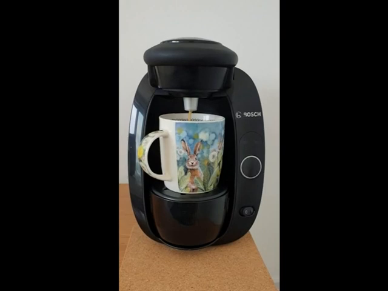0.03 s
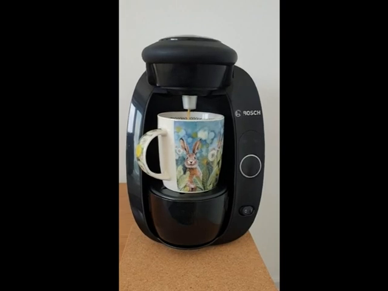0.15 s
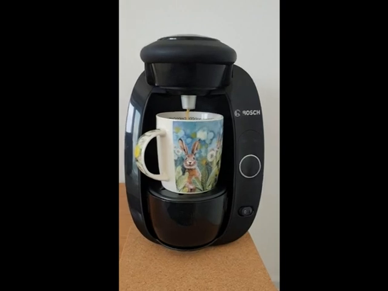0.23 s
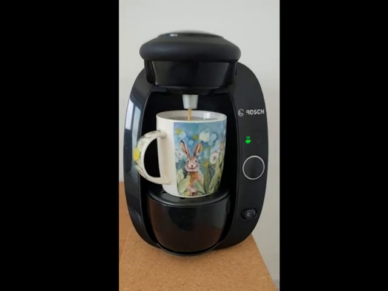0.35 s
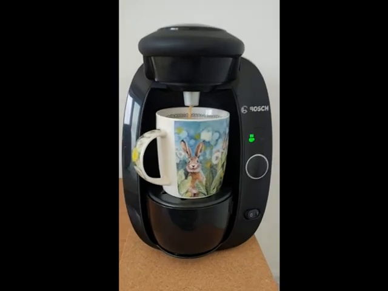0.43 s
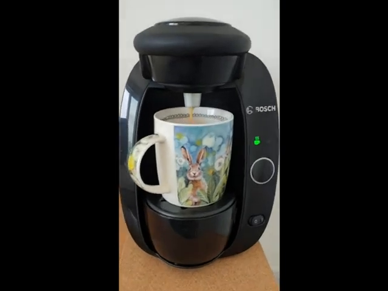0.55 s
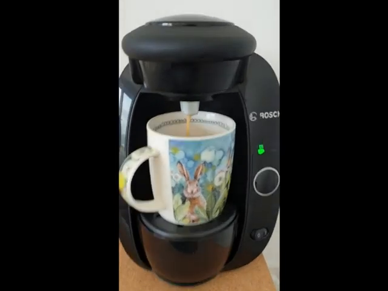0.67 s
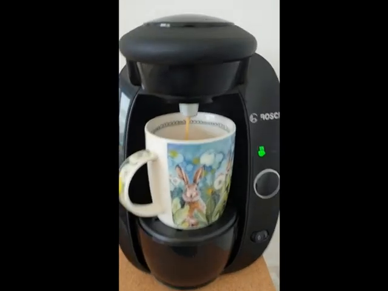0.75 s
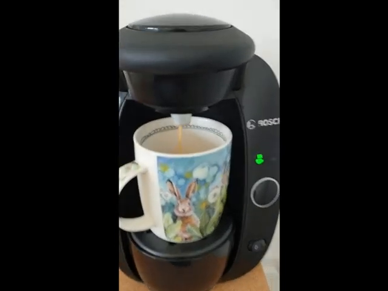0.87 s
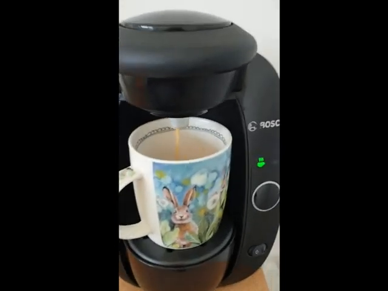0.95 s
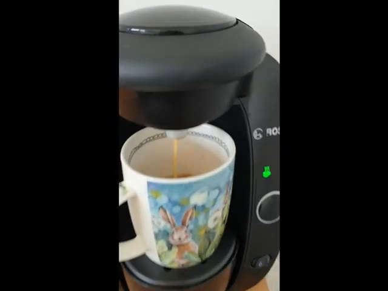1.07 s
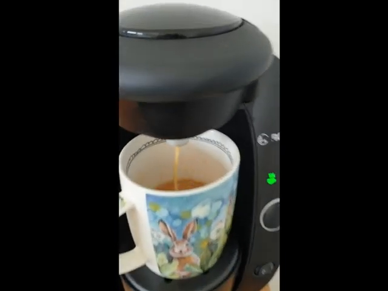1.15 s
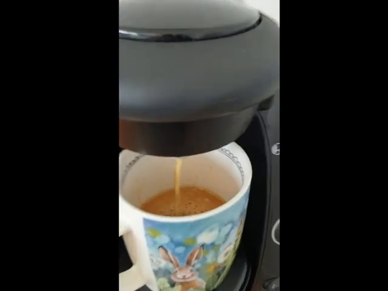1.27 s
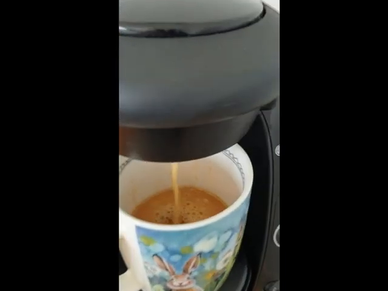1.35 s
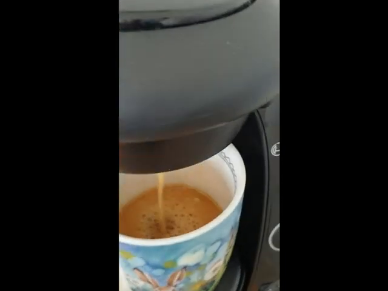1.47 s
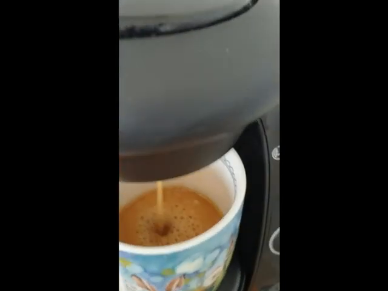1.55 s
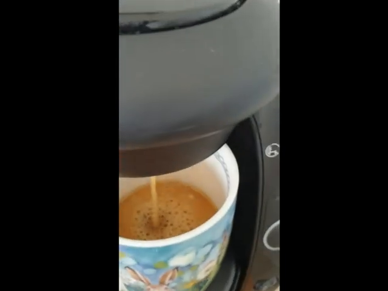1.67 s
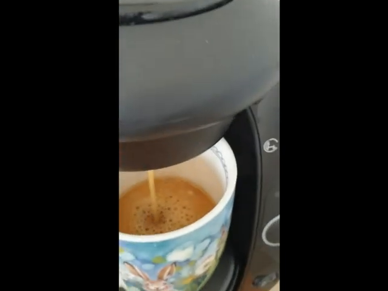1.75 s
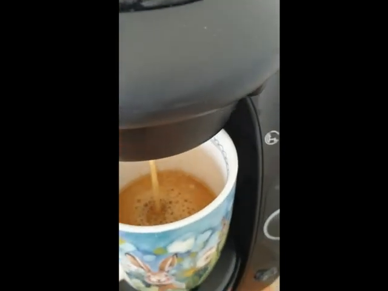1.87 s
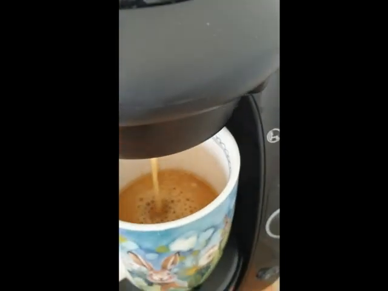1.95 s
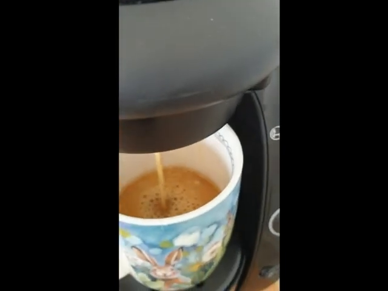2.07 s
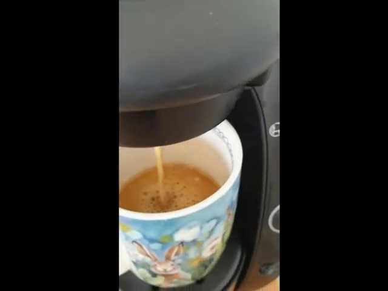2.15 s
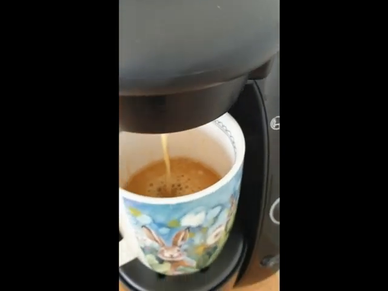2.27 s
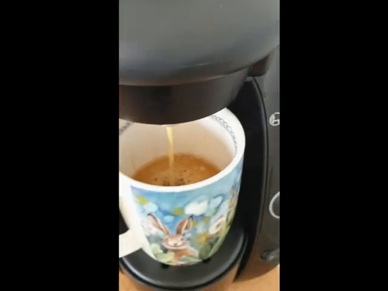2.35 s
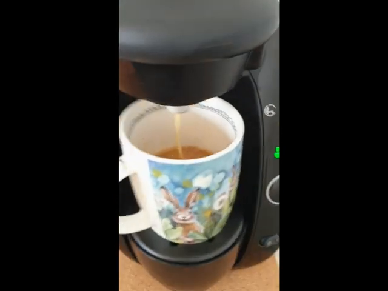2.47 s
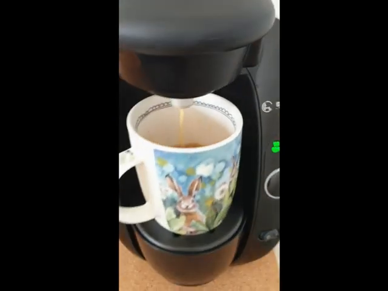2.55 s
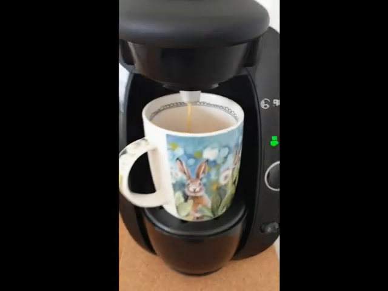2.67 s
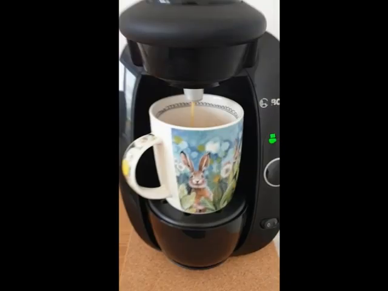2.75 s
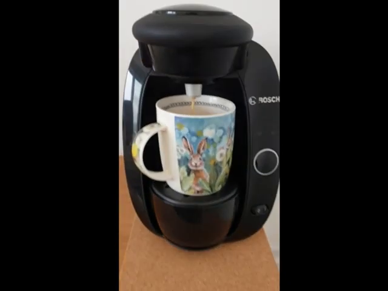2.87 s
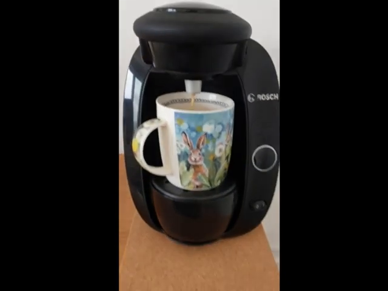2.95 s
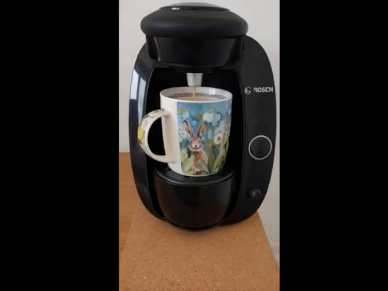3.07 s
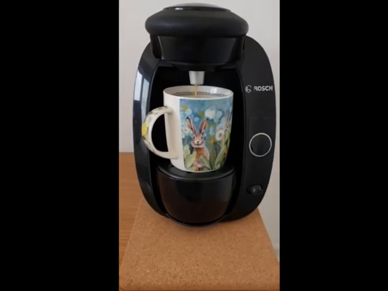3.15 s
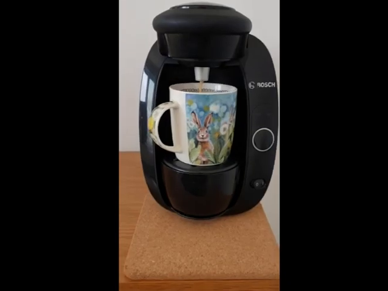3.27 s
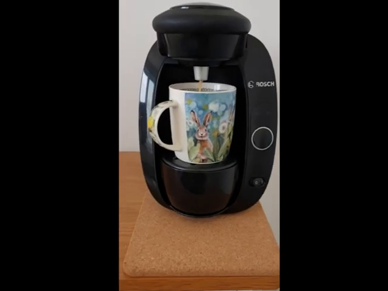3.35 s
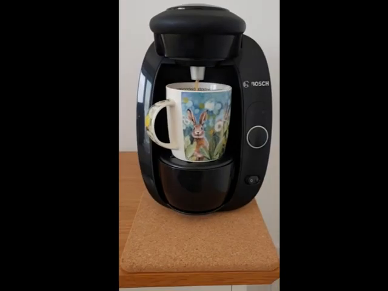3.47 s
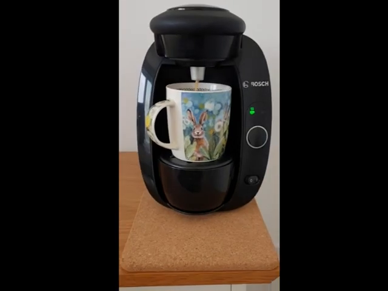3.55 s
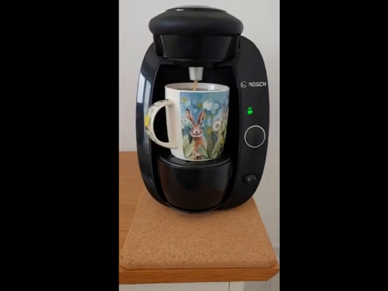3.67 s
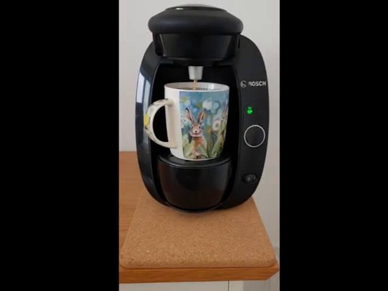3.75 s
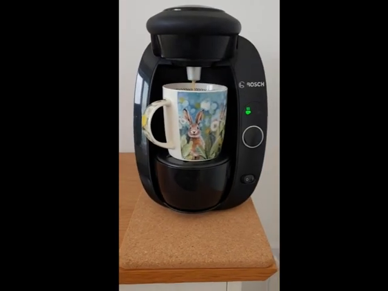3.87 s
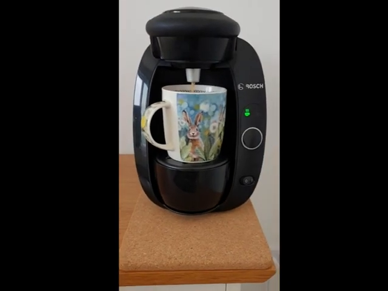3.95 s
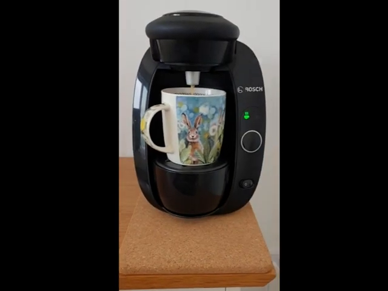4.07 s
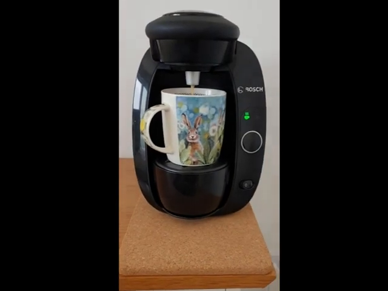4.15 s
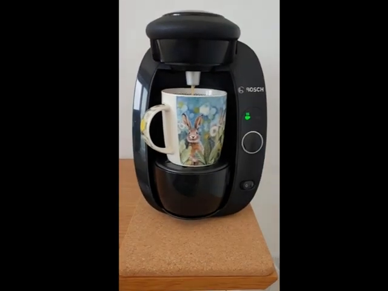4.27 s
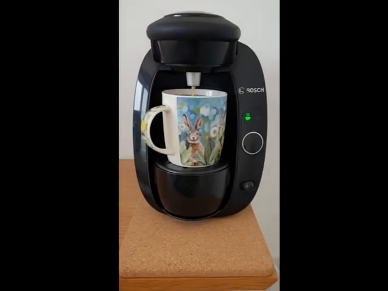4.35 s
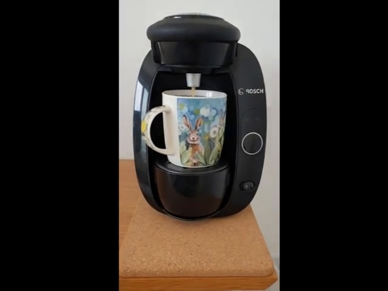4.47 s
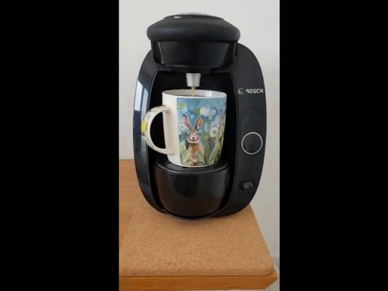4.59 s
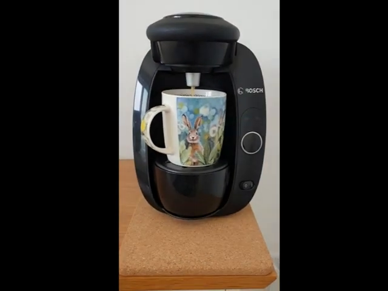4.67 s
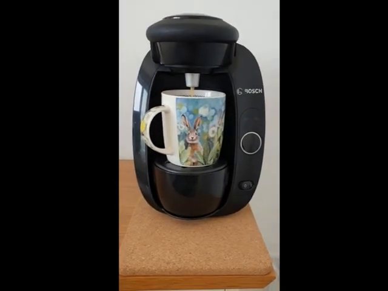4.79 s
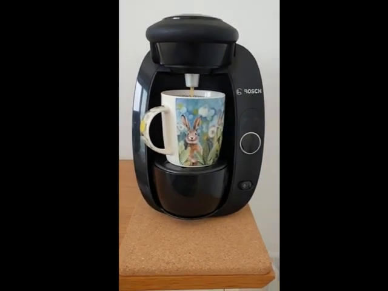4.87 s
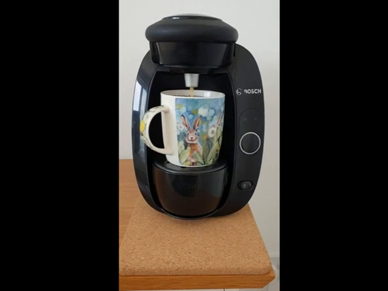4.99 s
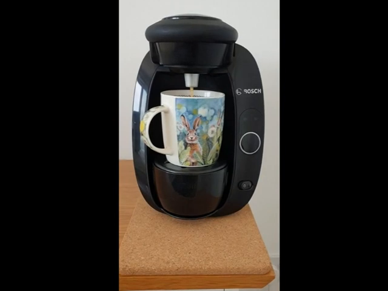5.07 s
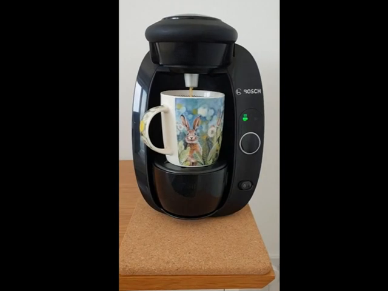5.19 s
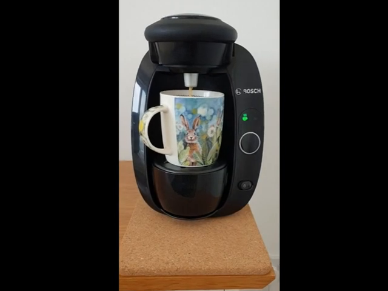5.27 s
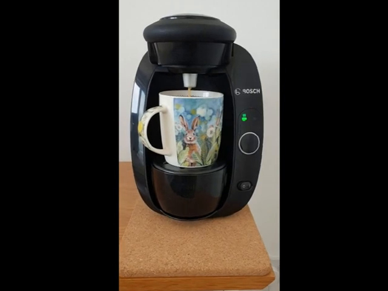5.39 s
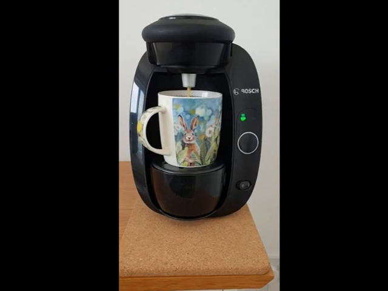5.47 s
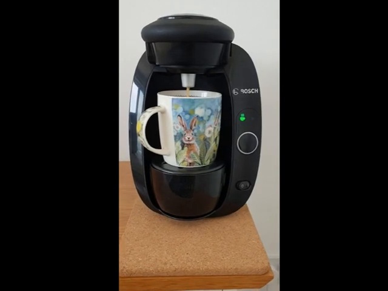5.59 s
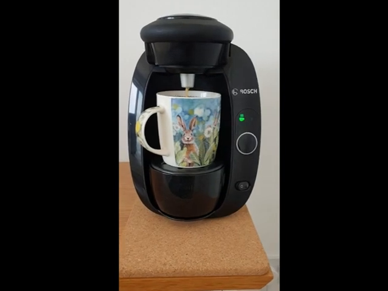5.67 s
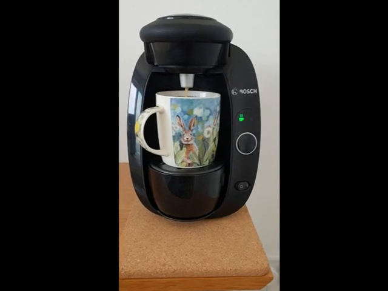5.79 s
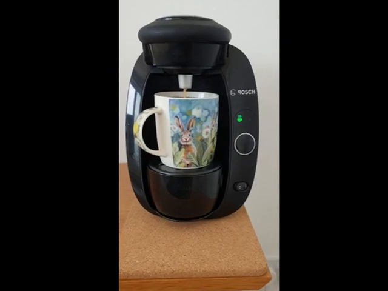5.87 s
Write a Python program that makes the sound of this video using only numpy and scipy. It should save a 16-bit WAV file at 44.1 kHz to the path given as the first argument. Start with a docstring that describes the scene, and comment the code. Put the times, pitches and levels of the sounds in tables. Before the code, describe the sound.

The steady buzzing hum of a coffee machine's pump, with coffee trickling and softly plopping into a mug.

```python
"""A steady hum and buzz fills a kitchen: a pod coffee machine's pump, shaking at the mains rate.
The pump pushes churning water to a nozzle, which hisses and whistles. Coffee streams into a mug,
where trapped bubbles plop and the foam fizzes and ticks. The microphone leans in to the mug
and back, and fingers softly scuff its case."""
import sys
import numpy as np
from scipy import signal
from scipy.fft import rfft, irfft, next_fast_len
from scipy.io import wavfile
from scipy.ndimage import map_coordinates

SR = 44100
rng = np.random.default_rng(int(sys.argv[2]) if len(sys.argv) > 2 else 0)


def inscribe(sig):
    """Save sig as 16-bit PCM at rate SR to the path in sys.argv[1].

    A 1-D sig is mono; a 2-D sig holds one channel per row.
    Samples are clipped to [-1, 1] before scaling.
    """
    pcm = np.round(np.clip(np.atleast_2d(sig).T, -1, 1) * 32767)
    wavfile.write(sys.argv[1], SR, pcm.astype(np.int16))


N = 261513
TIME = np.arange(N) / SR

# The tone colours of the kitchen, a finger's brush, the foam, the jet's spray and the piston's rattle.
# Each row: frequency in Hz, relative level in dB.
ROOM_COLOUR = [(15, -13.5), (35, -12.5), (62, 1), (90, -5.5), (160, -4), (240, -16.5), (500, -14.5),
               (2000, -32), (5000, -28), (7500, -36.5), (8500, -54), (16000, -42)]
BRUSH_COLOUR = [(150, -13), (300, 3.5), (600, 3.5), (1500, 5.5), (4000, -2.5), (6500, -4), (9000, -15),
                (12000, -20), (14000, -8), (15700, -17)]
FOAM_COLOUR = [(300, -35), (700, -0.5), (1200, 9), (1500, -6), (2800, 8.5), (3150, 2), (3700, 4),
               (4600, -0.5), (5400, 4), (6800, -5), (8000, -9.5), (8800, -23.5), (10000, -17.5),
               (15000, -31)]
SPRAY_COLOUR = [(7000, -39), (9000, -25), (11300, -17), (11800, -8), (12800, -4), (13300, 1.5), (14300, 3),
                (14900, -17.5), (15700, -26)]
RATTLE_COLOUR = [(1700, -40), (1900, -2), (2250, -3.5), (2500, -11), (2800, -7), (3150, -16), (3700, -12.5),
                 (4500, -14.5), (5300, -12.5), (7000, -35), (9000, -57)]
# Finger touches. Each row: start in seconds, brush level in dB, rise in seconds,
# seconds to fade by 60 dB, knock level in dB.
TOUCHES = [(0.349, -63.5, 0.0066, 0.11, -51), (3.243, -47, 0.015, 0.31, -50),
           (3.359, -51.5, 0.0023, 0.16, -47)]
# Bubbles bursting in the foam. Each row: start in seconds, level in dB, pitch in Hz.
FOAM_TICKS = [(1.574, -38, 3850), (1.727, -40, 2920), (1.728, -40, 4300)]
# The loudest plops in the mug. Each row: start in seconds, relative level in dB.
LOUD_PLOPS = [(0.095, -32.5), (.346, -35.5), (.529, -32.5), (1.038, -34), (1.182, -31), (1.508, -28.5),
              (1.879, -32.5), (2.935, -36.5), (3.179, -31.5), (3.387, -38), (3.75, -37), (4.638, -37.5),
              (5.175, -36.5)]
# Where the nozzle, the jet's whistle and the water in the housing ring.
# Each row: pitch in Hz, width in Hz, relative level in dB.
NOZZLE_RINGS = [(2250, 430, -8), (2690, 590, 2), (3530, 140, 3), (4075, 130, 4), (5400, 360, 0.5),
                (6770, 200, -2.5), (7750, 140, -7.5)]
WHISTLE_RINGS = [(6163, 290, 0)]
CHURN_RINGS = [(369.5, 36, 0), (572, 120, -2), (700, 130, -3), (930, 320, -8.5), (1298, 61, -8),
               (1618, 200, -12.5), (1850, 270, -14)]
# Brief swells in level; the last is a short treble flick over a burble. Each row: middle in seconds,
# half length in seconds, then the boosts in dB for the whistle, the spray's high hiss and the churn.
SWELLS = [(0.707, 0.2, 5, -0.5, 1.5), (3.446, 0.45, 0.5, 3, 0), (5.115, 0.068, 4.5, 4.5, 1.5)]
# The housing's tone from the front, from one side and at the mug.
# Each row: multiple of the pump's stroke rate, relative level in dB.
TONE_FRONT = [(1, -3.5), (2, 5.5), (3, 0.5), (4, -14), (5, -21), (6, -33.5), (7, -34.5), (8, -19.5),
              (9, -30.5), (10, -23), (11, -23), (12, -37), (13, -27), (14, -22), (15, -30.5), (16, -14.5),
              (17, -22.5), (18, -33), (19, -33.5), (20, -53.5), (21, -27), (22, -25.5), (23, -31.5),
              (24, -50), (25, -28.5), (26, -40.5), (27, -42), (28, -28), (29, -56), (30, -33.5),
              (31, -37.5), (32, -40.5), (33, -41.5), (34, -36.5), (35, -38), (36, -31.5)]
TONE_SIDE = [(1, -7.5), (2, 2.5), (3, -3.5), (4, -15), (5, -19.5), (6, -42.5), (7, -54), (8, -24.5),
             (9, -45), (10, -27.5), (11, -23.5), (12, -33.5), (13, -18), (14, -25), (15, -26.5), (16, -22),
             (17, -35), (18, -32.5), (19, -27), (20, -27.5), (21, -29.5), (22, -27.5), (23, -27.5),
             (24, -44), (25, -25), (26, -27.5), (27, -35.5), (28, -34.5), (29, -48), (30, -40), (31, -38),
             (32, -43.5), (33, -33), (34, -40.5), (35, -43.5), (36, -38)]
TONE_AT_MUG = [(1, -13), (2, 0), (3, -5.5), (4, -16.5), (5, -24.5), (6, -29), (7, -21), (8, -17.5),
               (9, -26), (10, -20), (11, -24.5), (12, -37), (13, -25), (14, -28), (15, -31), (16, -20.5),
               (17, -33), (18, -34.5), (19, -25), (20, -42.5), (21, -41.5), (22, -40), (23, -37), (24, -41),
               (25, -28), (26, -27), (27, -36), (28, -35.5), (29, -44), (30, -46.5), (31, -48), (32, -40),
               (33, -43.5), (34, -40.5), (35, -48), (36, -41)]
# Stereo balance far from the mug and over it. Each row: frequency in Hz, left minus right in dB.
BALANCE_FAR = [(50, -1), (100, -0.5), (150, 3), (210, -3), (340, 11.5), (500, 1.5), (780, -5.5), (1170, 0),
               (1790, -1), (2740, -3), (4190, -8), (6300, -4), (9800, -3), (14000, -12.5)]
BALANCE_AT_MUG = [(60, 1.5), (110, 1.5), (200, 2), (380, -1), (700, -4.5), (1290, -2), (2380, 1.5),
                  (4400, -1.0), (8120, -3.5), (15000, -11.5)]
# How alike left and right are. Each row: frequency in Hz, likeness (1 the same, 0 unrelated).
LIKENESS = [(100, 1), (300, 0.92), (700, 0.66), (1300, 0.51), (2500, -0.074), (4200, 0.039), (6200, -0.28),
            (9000, 0.059)]

PUMP_HZ, HUM_TOP_HZ = 50.06, 280  # the stroke rate, and where hum gives way to buzz


def amp(db):
    """Turn decibels into a gain."""
    return 10 ** (np.asarray(db) / 20)


def unit(x):
    """Scale a sound to an average (rms) level of 1."""
    return x / np.sqrt(np.mean(x ** 2) + 1e-20)


def along(points, hz):
    """Read between a table's rows on a log frequency scale."""
    freqs, values = np.transpose(points)
    return np.interp(np.log(hz + 1), np.log(freqs + 1), values)


def wobble(rate):
    """A smooth random curve through `rate` new values a second."""
    return map_coordinates(rng.standard_normal(int(N * rate / SR) + 4), [TIME * rate])


def filtered(x, response):
    """Turn each frequency up or down by response(hz)."""
    size = next_fast_len(N + SR // 4)
    return irfft(rfft(x, size) * response(np.fft.rfftfreq(size, 1 / SR)), size)[..., :N]


def colour(points):
    """Make a filter response from a tone colour table."""
    return lambda hz: amp(along(points, hz))


def resonances(rings):
    """Make a filter response with one steep peak for each row."""
    return lambda f: np.sqrt(sum((amp(db) / (1 + 2 * ((f - hz) / width) ** 2)) ** 2
                                 for hz, width, db in rings))


def stereo_angle(hz):
    """An angle that grows as left and right become less alike."""
    return np.arccos(np.clip(along(LIKENESS, hz), -1, 1)) / 2


def stereo(pair, response):
    """Filter two unrelated sounds and blend them into left and right at level 1."""
    blend = lambda hz: np.array([np.cos(stereo_angle(hz)), np.sin(stereo_angle(hz))])
    mid, side = filtered(pair, lambda hz: response(hz) * blend(hz))
    return unit(np.array([mid + side, mid - side]))


def noise(response, flicker_db=0):
    """Filtered stereo noise at level 1, made uneven by a flicker curve if given."""
    return stereo(rng.standard_normal((2, N)) * amp(flicker_db), response)


def bubble(t, hz, cycles, glide):
    """A bubble swells within one cycle, rises in pitch and fades by 60 dB over `cycles`."""
    age = t * hz / cycles
    swell = 1 - np.exp(-(t * hz) ** 2)
    return swell * amp(-60 * age) * np.sin(2 * np.pi * hz * t * (1 + glide * age))


def balanced(sound, balance):
    """Share each frequency between left and right, keeping the total power."""
    def response(hz):
        left_db = along(balance, hz) / 2
        sides = amp([left_db, -left_db])
        return sides / np.sqrt(np.mean(sides ** 2, axis=0))
    return filtered(sound, response)


def microphone(start_s, lean_s, hold_s, back_s, rest_nearness, swing_s):
    """The microphone leans in to the mug and back while swinging from one side to the front."""
    lean_in = np.clip((TIME - start_s) / lean_s, 0, 1)
    draw_back = np.clip((TIME - start_s - lean_s - hold_s) / back_s, 0, 1)
    near = np.clip(lean_in - (1 - rest_nearness) * draw_back, 0, 1)  # 0 far, 1 over the rim
    aside = np.clip(1 - TIME / swing_s, 0, 1)  # 1 at the side, 0 in front
    return near, aside


def swells():
    """The whistle, the high hiss and the churn swell briefly: one curve in dB for each."""
    return sum(np.outer(boosts, np.exp(-((TIME - middle) / half_length) ** 2))
               for middle, half_length, *boosts in SWELLS)


def kitchen(level_db):
    """The room's low, steady noise."""
    return amp(level_db) * noise(colour(ROOM_COLOUR))


def scuffs(knock_hz, knock_fade_s):
    """Fingers brush the case beside the microphone and knock it dully."""
    brush = knock = 0
    for start, brush_db, rise_s, fade_s, knock_db in TOUCHES:
        t = np.maximum(TIME - start, 0)
        onset = 1 - np.exp(-t / rise_s)
        brush += amp(brush_db - 60 * t / fade_s) * onset
        knock += amp(knock_db - 60 * t / knock_fade_s) * onset * np.sin(2 * np.pi * knock_hz * t)
    return brush * noise(colour(BRUSH_COLOUR)) + knock


def foam_fizz(near, level_db, far_share, crackle_db):
    """The stream fizzes in the foam, heard best over the rim."""
    return amp(level_db) * (far_share + near) * noise(colour(FOAM_COLOUR), crackle_db * wobble(300))


def foam_ticks(cycles):
    """Each bursting bubble rings high for an instant."""
    return sum(amp(db) * bubble(np.maximum(TIME - start, 0), hz, cycles, glide=0.05)
               for start, db, hz in FOAM_TICKS)


def nozzle(near, whistle_swell_db, spray_swell_db, hiss_db, sputter_db):
    """The jet sputters through the ringing nozzle, whistles hoarsely and throws a fine, high spray."""
    whistle_db = -63.5 + 2 * near + whistle_swell_db + 0.5 * wobble(7)
    spray_db = -73 + 3 * near + spray_swell_db - 0.65 * TIME  # fades as the brew goes on
    sputter = lambda: sputter_db * wobble(110) + 0.65 * np.cos(2 * np.pi * PUMP_HZ * TIME)
    follow_db = 0.61 * (spray_db - spray_db.mean())  # the hiss partly follows the spray
    hiss = amp(hiss_db + follow_db) * noise(resonances(NOZZLE_RINGS), sputter())
    whistle = amp(whistle_db) * noise(resonances(WHISTLE_RINGS), sputter())
    spray = amp(spray_db + 0.86 * wobble(30)) * noise(colour(SPRAY_COLOUR))
    return hiss + whistle + spray


def stream(level_db, pitch_hz, spread, size_db, cycles, count):
    """The falling coffee traps many small bubbles in the mug; tinier ones ring higher."""
    t = np.arange(SR // 40) / SR
    starts = (rng.random((count, 1)) * N).astype(int)
    pitches = pitch_hz * np.exp(spread * rng.standard_normal((count, 1)))
    sizes = np.minimum(rng.exponential(size=(count, 1)), 3)
    bubbles = amp(size_db * sizes) * bubble(t, pitches, cycles, glide=0.13)
    places = (starts + np.arange(len(t))).ravel()
    pair = []
    for _ in range(2):  # random flips make two unrelated sounds from the same bubbles
        flipped = bubbles * rng.choice([-1, 1], (count, 1))
        pair.append(np.bincount(places, flipped.ravel(), N)[:N])
    return amp(level_db) * stereo(np.array(pair), lambda hz: hz > 0)


def plops(gain_db, pitch_hz, cycles, echo_db, echo_fade_s, weak_count):
    """Larger bubbles plop among weaker random ones; the nook around the mug echoes each briefly."""
    out = np.zeros((2, N + SR))
    t = np.arange(SR // 16) / SR
    loud_spread, weak_spread = 0.05, 0.22  # weak plops vary more in pitch
    loud = [(start, db, loud_spread) for start, db in LOUD_PLOPS]
    weak = [(rng.random() * N / SR, rng.normal(-43.5, 3), weak_spread) for _ in range(weak_count)]
    for start, db, spread in loud + weak:
        plop = bubble(t, pitch_hz * np.exp(spread * rng.standard_normal()), cycles, glide=0.16)
        plop = amp(db + gain_db) * plop / np.abs(plop).max()
        nook = rng.standard_normal((2, len(t))) * amp(-60 * t / echo_fade_s)
        echo = signal.fftconvolve(plop[None], nook / np.linalg.norm(nook[0]), axes=1)[:, :len(t)]
        first = round(start * SR)
        out[:, first:first + len(t)] += plop + amp(echo_db) * echo
    return out[:, :N]


def churn(level_db, pulse_db):
    """Each pump stroke pushes water through the ringing housing."""
    push_db = pulse_db * np.sin(2 * np.pi * PUMP_HZ * TIME) + 1.3 * wobble(25)
    return amp(level_db) * noise(resonances(CHURN_RINGS), push_db)


def pump(near, aside, smear, ring_fade_s, rebound, rebound_at, buzz_db, rattle_db):
    """The piston strikes and rebounds once a mains cycle; the housing rings after each stroke."""
    size = 2048  # points in one cycle
    t = np.arange(size) / size / PUMP_HZ
    stroke = amp(-60 * t / ring_fade_s)
    ring = rng.standard_normal(size) * (stroke + rebound * np.roll(stroke, int(size * rebound_at)))
    multiple = np.arange(size // 2 + 1)
    hz = multiple * PUMP_HZ
    # the soft mount smears the low tones into a round hum; the ring sets the timing of the rest
    lag = np.where(hz < HUM_TOP_HZ, -smear * multiple ** 2, np.angle(rfft(ring)))
    # higher tones reach left and right further out of step
    apart = stereo_angle(hz) * (-1) ** multiple
    phase = np.exp(1j * (lag + np.array([apart, -apart])))

    def repeat(levels_db):
        cycle = irfft(phase * amp(levels_db))
        return unit(np.array([np.interp(TIME, t, side, period=1 / PUMP_HZ) for side in cycle]))

    def tone(table):
        return repeat(np.interp(multiple, *np.transpose(table), left=-120, right=-120))

    far_tone = aside * tone(TONE_SIDE) + (1 - aside) * tone(TONE_FRONT)
    housing = near * tone(TONE_AT_MUG) + (1 - near) * far_tone
    hum = filtered(housing, lambda f: 1 / (1 + (f / HUM_TOP_HZ) ** 8))
    buzz = amp(buzz_db) * (housing - hum)
    rattle = repeat(along(RATTLE_COLOUR, hz))
    rattle *= amp(rattle_db + 1.5 * wobble(60))  # no two strokes rattle alike
    rattle *= 0.085 + np.maximum(near, 0.91 * aside)  # clearest up close or from the side
    return amp(-33.5 + 1.5 * near) * (hum + buzz) + rattle


def scene():
    """The mug and the machine over the kitchen's low noise, heard from a moving microphone."""
    near, aside = microphone(start_s=0.39, lean_s=1.0, hold_s=1.045, back_s=0.92,
                             rest_nearness=0.027, swing_s=5.4)
    near_housing = near ** 0.84  # the housing is broad, so its tone comes sooner and stays longer
    whistle_swell_db, spray_swell_db, churn_swell_db = swells()
    sound = kitchen(level_db=-53.5)
    sound += scuffs(knock_hz=300, knock_fade_s=0.16)
    sound += foam_fizz(near, level_db=-57.5, far_share=0.055, crackle_db=2.5)
    sound += foam_ticks(cycles=24)
    sound += nozzle(near, whistle_swell_db, spray_swell_db, hiss_db=-64.5, sputter_db=1.5)
    sound += stream(level_db=-80 + 17 * near, pitch_hz=3613, spread=0.04, size_db=2.5,
                    cycles=49, count=1500)
    sound += stream(level_db=-62 + 9 * near, pitch_hz=845, spread=0.16, size_db=1, cycles=12, count=900)
    sound += plops(gain_db=-2, pitch_hz=915, cycles=10, echo_db=-8.5, echo_fade_s=0.065, weak_count=18)
    sound += churn(level_db=-53.5 + 1.5 * near + churn_swell_db, pulse_db=1.5)
    sound += pump(near_housing, aside, smear=1.081, ring_fade_s=0.053, rebound=0.38, rebound_at=0.4,
                  buzz_db=1.86, rattle_db=-64)
    return (1 - near) * balanced(sound, BALANCE_FAR) + near * balanced(sound, BALANCE_AT_MUG)


def record(dry):
    """Cut away the very highest treble."""
    return filtered(dry, lambda hz: hz < 15720)


dry = scene()
out = record(dry)
inscribe(out)
```